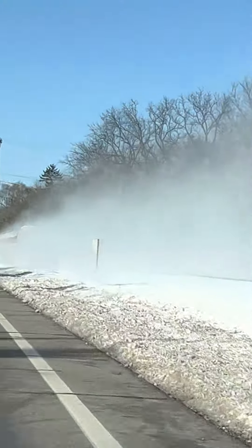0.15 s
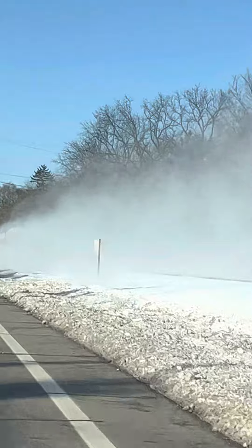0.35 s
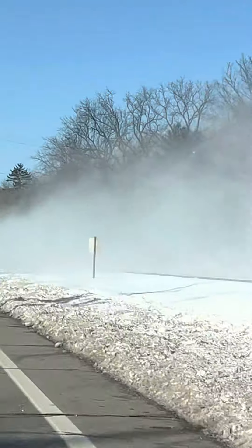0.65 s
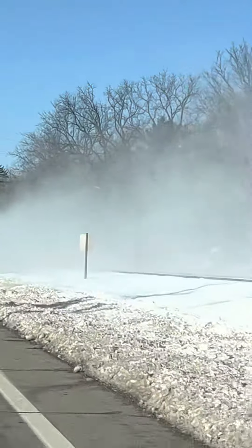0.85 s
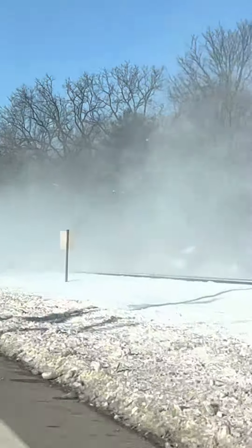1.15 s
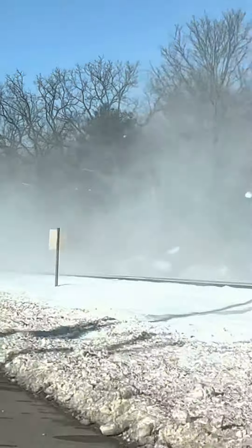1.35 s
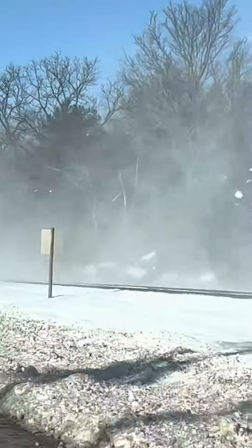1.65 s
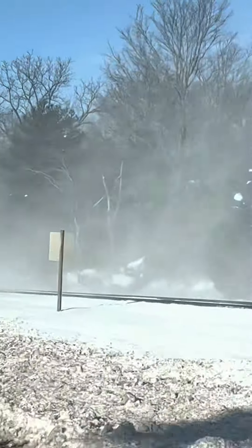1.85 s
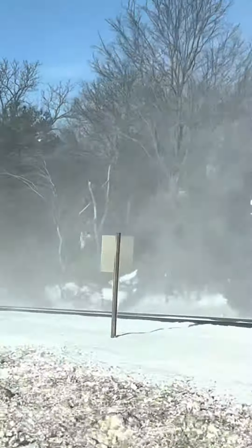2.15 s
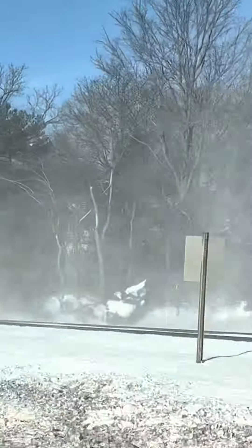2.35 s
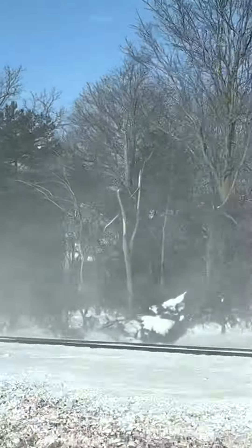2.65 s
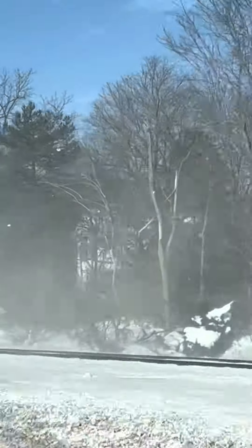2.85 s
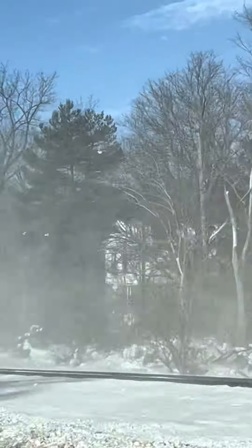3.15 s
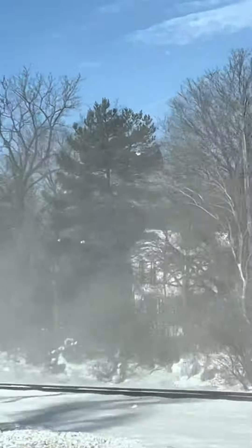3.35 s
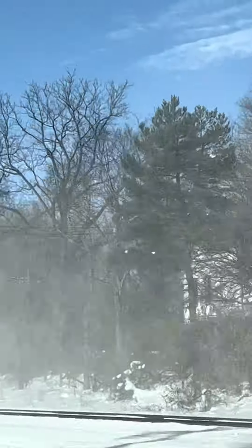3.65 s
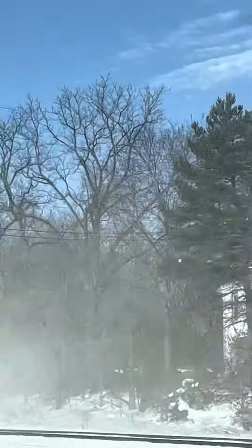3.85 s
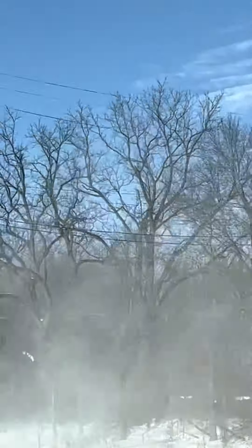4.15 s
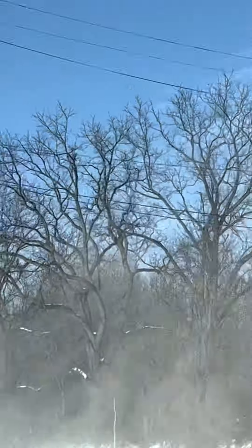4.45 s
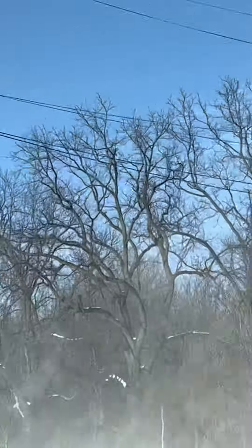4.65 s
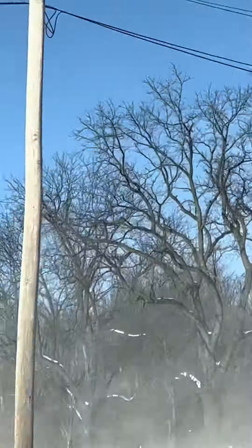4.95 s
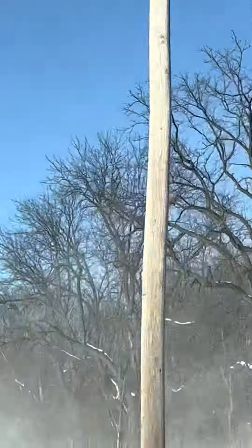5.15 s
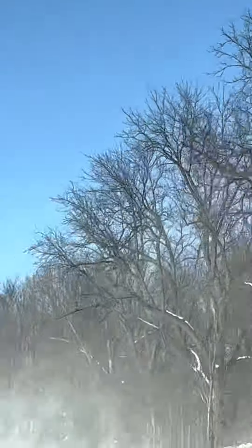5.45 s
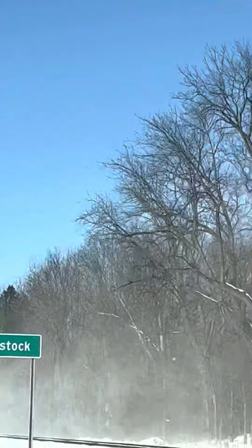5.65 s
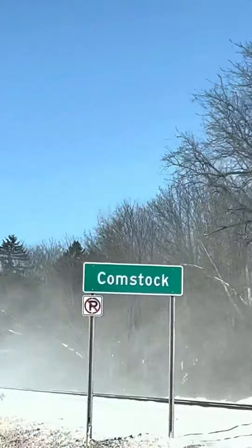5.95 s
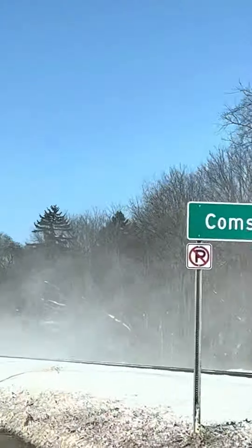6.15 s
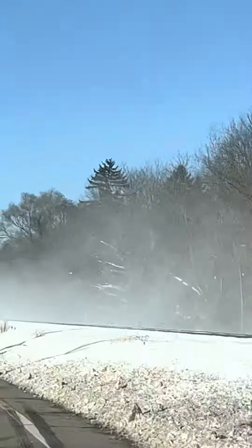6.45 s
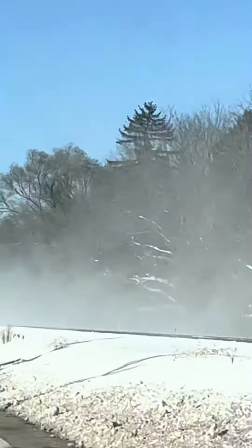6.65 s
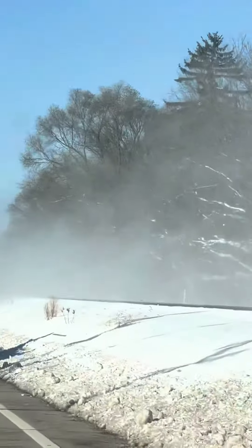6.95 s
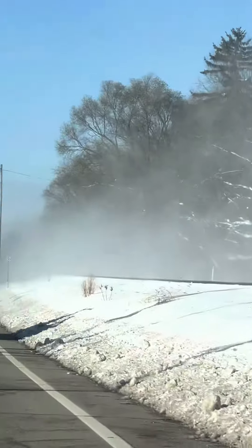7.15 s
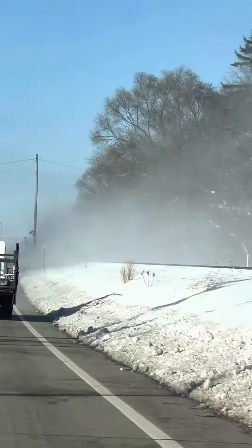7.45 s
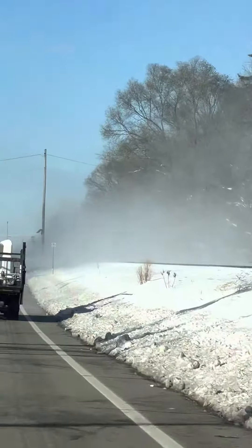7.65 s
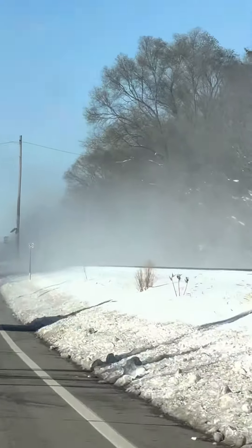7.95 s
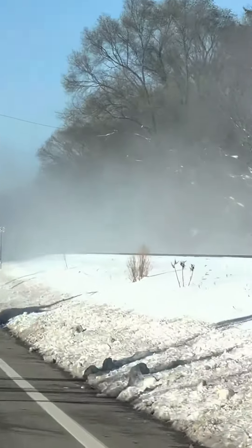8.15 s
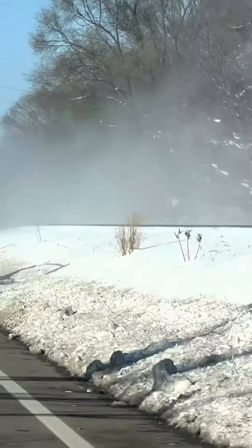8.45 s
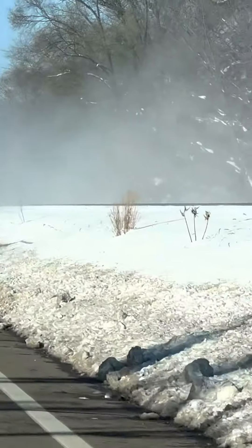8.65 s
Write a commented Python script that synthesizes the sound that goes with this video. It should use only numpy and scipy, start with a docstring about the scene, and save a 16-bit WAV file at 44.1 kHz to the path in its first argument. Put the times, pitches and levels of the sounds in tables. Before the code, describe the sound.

Low, uneven road rumble heard from a car seat, with bumps thumping the floor, slushy spray hissing louder, and faint grit ticks.

```python
"""The road shakes a car from below: its cabin booms, its panels rumble, and a dip and blows rock and thump the floor.
The tyres roar and drone, and their slushy spray hisses louder as the road gets wetter; lumps of slush rattle.
Wind rushes past the window, a breathy whistle fades as the drone fades, grit ticks and some plastic clicks once.
Most layers are noise shaped by resonances, with levels that follow the road, the water and the gusts;
the thumps are short sines, and the click is a set of ringing modes."""
import sys
import numpy as np
from scipy import signal
from scipy.fft import rfft, irfft
from scipy.io import wavfile
from scipy.ndimage import uniform_filter1d

SR = 44100
rng = np.random.default_rng(int(sys.argv[2]) if len(sys.argv) > 2 else 0)


def generate_wav(sig):
    """Save sig (samples, or channels by samples) to the path in sys.argv[1] as 16-bit PCM at SR."""
    pcm = np.round(np.clip(np.atleast_2d(sig).T, -1, 1) * 32767).astype(np.int16)
    wavfile.write(sys.argv[1], SR, pcm)


N = 388080   # samples: 8.8 s
TIME = np.arange(N) / SR   # seconds
BINS = np.maximum(np.arange(N // 2 + 1) * SR / N, 1)   # Hz of each frequency bin, at least 1


def from_db(db):
    """Turn decibels into gain."""
    return 10 ** (np.asarray(db) / 20)


def rms_one(x):
    """Scale to an rms (average strength) of one."""
    return x / np.sqrt(np.mean(x ** 2) + 1e-20)


def in_time(rows):
    """Draw each column of a (seconds, ..) table as a curve over time."""
    s, *columns = np.transpose(rows)
    return [np.interp(TIME, s, column) for column in columns]


def in_frequency(rows):
    """Draw each column of a (Hz, ..) table as a curve over frequency, on a log scale."""
    hz, *columns = np.transpose(rows)
    return [np.interp(np.log(BINS), np.log(hz), column) for column in columns]


def colour(points):
    """Gain per bin of a (Hz, dB) spectrum."""
    return from_db(in_frequency(points)[0])


def resonances(modes):
    """Gain per bin of separately driven resonances, whose powers add."""
    power = 0
    for hz, width_hz, db in modes:
        detuning = (BINS ** 2 - hz ** 2) / (BINS * width_hz)
        power = power + from_db(db) ** 2 / (1 + detuning ** 2)
    return np.sqrt(power)


def shaped(drive, gain):
    """Filter a drive by a gain per bin, then scale it to an rms of one."""
    return rms_one(irfft(rfft(drive) * gain, N))


def white():
    """Two unrelated noises: the direct sound and its diffuse part."""
    return rng.standard_normal((2, N))


def drift(rate_hz):
    """Slow random motion with a spread of one."""
    return shaped(rng.standard_normal(N), 1 / (1 + (BINS / rate_hz) ** 2))


def flicker(rate_hz, span_s=0.16):
    """Quick random motion with no slow swell and no extreme peaks."""
    chance = drift(rate_hz)
    slow_swell = uniform_filter1d(chance, max(int(span_s * SR), 2))
    return 2 * np.tanh(rms_one(chance - slow_swell) / 2)


def evened(x, span_s):
    """Hold a noise at a constant strength over the given span."""
    power = uniform_filter1d(x ** 2, max(int(span_s * SR), 2), axis=-1)
    return x / np.sqrt(power + 1e-6)


def wavering(x, share, rate_hz):
    """Let every resonance in a sound wander in pitch by stretching time a little."""
    place = np.cumsum(1 + share * drift(rate_hz)) % N
    return np.array([np.interp(place, np.arange(N), part) for part in x])


def held(end_s, fade_s, first_db, later_db):
    """A level in dB that holds, then glides to another."""
    return np.interp(TIME, [end_s, end_s + fade_s], [first_db, later_db])


def swell(crest_s, length_s, time=TIME):
    """A smooth rise to one and fall again; the length is taken at half height."""
    return np.exp2(-np.minimum((2 * (time - crest_s) / length_s) ** 2, 60))


def swells(rows):
    """Sum of swells from rows of (crest s, length s, height)."""
    coarse = TIME[::32]   # drawn on every 32nd sample to save work
    total = sum(height * swell(s, length, coarse) for s, length, height in rows)
    return np.interp(TIME, coarse, total)


def loudness_swells(rows):
    """Sum of swells whose heights are given in dB, as a gain."""
    return swells([(s, length, from_db(db)) for s, length, db in rows])


def bursts(rows):
    """Short dying scratches of contact noise from rows of (start s, dB, t60 s)."""
    envelope = np.zeros(N)
    age = TIME[:SR // 10]
    for s, db, t60 in rows:
        start = round(s * SR)
        envelope[start:start + len(age)] += from_db(db - 60 * age / t60)
    return envelope * white()


def ring(drive, hz, t60):
    """A resonator: a unit click sets a sine of height one ringing, dying by 60 dB in t60 seconds."""
    r, w = from_db(-60 / (t60 * SR)), 2 * np.pi * hz / SR
    return signal.lfilter([0, np.sin(w)], [1, -2 * r * np.cos(w), r * r], drive + 1e-18)


# Narrow resonances of the body panels and wheel arches.
# Each row: pitch in Hz, width in Hz, strength in dB (doubled when the resonances are squared).
BODY_MODES = [(204.5, 10, -1.5), (262, 22, -7.5), (603, 37, -1.5), (675, 68, -5.5), (1059, 18, -0.5),
              (1614, 52, -0.5), (1997, 70, -2), (2237, 130, 0.5), (2428, 86, 7), (2670, 46, -6.5),
              (3330, 14, 0), (3490, 39, 0.5), (4340, 300, 0.5), (6670, 430, -0.5), (7500, 110, -6.5),
              (10100, 120, 1.5)]


def through_body(drive, spectrum):
    """Sound from outside takes on a colour and the resonances of the body; rms one."""
    return shaped(drive, colour(spectrum) * (1 + resonances(BODY_MODES) ** 2))


# How strongly the car booms and rumbles.
# Each row: time in seconds, cabin boom in dB, panel rumble in dB, both before surges and trims.
ROAD_SHAKE = [(0, -27.5, -25), (.33, -24, -28.5), (.85, -28, -27), (1.25, -27, -33), (2.6, -24, -30),
              (3.2, -25, -27), (5.0, -22.5, -27.5), (6.9, -22, -26), (7.5, -20.5, -24), (8.8, -19.5, -25)]
# Surges and lulls of boom and rumble: bumps under the wheels, and air modes beating.
# Each row: crest in seconds, length in seconds, rise of the boom in dB, rise of the rumble in dB.
SURGES = [(0.058, 0.036, 6.5, 1.5), (0.137, 0.045, -10.5, 1.5), (0.194, 0.11, 3, 4.5),
          (0.312, 0.068, -8.5, -4.5), (.426, 0.12, 1, 0.5), (0.566, 0.052, 6.5, 2), (.675, 0.057, 10.5, -1),
          (.96, 0.04, 0, -2), (1.116, .098, 9, -1.5), (1.357, 0.077, -7, 2.5), (1.508, 0.062, 5, 0.5),
          (1.815, .08, 2, 1.5), (1.916, 0.12, -3.5, 1.5), (2.087, .06, 9, 0), (2.195, 0.049, 3.5, 5),
          (2.342, 0.095, -5, 4), (2.485, 0.18, 2, 3), (2.76, 0.089, 0, -0.5), (3.159, .07, 7.5, -2.5),
          (3.363, 0.048, 9.5, -0.5), (3.447, 0.037, 4.5, -1), (3.795, 0.11, -3, 0.5), (3.895, 0.028, 7, -1),
          (4.059, 0.079, -5, -4), (4.158, .05, 1.5, -5), (4.29, 0.044, 6, -5), (4.365, 0.04, 7, 0),
          (4.537, 0.14, -7, 1), (4.742, .05, 3, 0), (4.972, 0.07, 3, 0), (5.09, .1, -5.5, -1.5),
          (5.25, 0.076, 4.5, 1.5), (5.423, 0.1, 6.5, 2), (5.574, 0.068, -8.5, 1), (5.648, 0.018, 2, 3.5),
          (5.94, 0.063, 9, 0.5), (6.04, 0.053, -0.5, 4), (6.18, 0.088, 1.5, 3.5), (6.278, .09, -5.5, -2.5),
          (6.476, 0.12, 6, 3), (6.561, 0.031, 5, .5), (6.675, 0.056, 6, 2.5), (6.84, 0.11, -4.5, -2),
          (6.928, 0.057, 4, 1), (7.08, .064, 6.5, -4.5), (7.25, 0.038, 5, 5), (7.382, 0.045, 4.5, -0.5),
          (7.637, 0.031, 2, 1.5), (7.77, 0.33, -1, 0.5), (7.97, 0.16, 1, 1), (8.17, .055, 7, 0.5),
          (8.277, .1, -6.5, 1), (8.49, 0.065, -8.5, 4), (8.56, 0.082, 4.5, 1), (8.79, 0.14, 5.5, 3.5)]


def road_levels(uneven_db=2.04):
    """Levels of boom and rumble, and the jolts: rumble surges plus quick unevenness, all in dB."""
    boom_db, rumble_db = in_time(ROAD_SHAKE)
    boom_surge_db = swells([(s, length, boom) for s, length, boom, rumble in SURGES])
    rumble_surge_db = swells([(s, length, rumble) for s, length, boom, rumble in SURGES])
    jolt_db = rumble_surge_db + uneven_db * flicker(rate_hz=17)
    return boom_db + boom_surge_db, rumble_db + jolt_db, jolt_db


# Air modes of the cabin, the deepest first.
# Each row: pitch in Hz, width in Hz, strength in dB within its group (the deepest is scaled by itself).
CABIN_AIR_MODES = [(56.2, 6.8, 2.5), (67.7, 5.3, 6.5), (81, 24, -12), (96.3, 14, -6)]
WAVY_FROM_S = 4.1   # longer waves in the road begin to favour the deepest air mode


def cabin_boom(level_db, trim_db=1.83, top_hz=125, early_deep_db=-5.5, late_deep_db=0.0):
    """The road drives the lowest air modes, which beat together; the deepest grows on the wavy stretch."""
    dull = 1 / np.sqrt(1 + (BINS / top_hz) ** 8)   # little boom above top_hz
    deepest, *others = CABIN_AIR_MODES
    deep_gain = from_db(held(WAVY_FROM_S, .3, early_deep_db, late_deep_db))
    deep = deep_gain * shaped(white(), resonances([deepest]) * dull)
    upper = shaped(white(), resonances(others) * dull)
    return from_db(level_db + trim_db) * evened(deep + upper, span_s=0.1)


# Colour of the panel rumble. Each row: frequency in Hz, relative level in dB.
PANEL_COLOUR = [(20, -13.5), (60, -7), (100, -1.5), (132, 1), (160, -3.5), (190, -5.5), (222, -10),
                (260, -7), (330, -9.5), (400, -13), (500, -23.5), (800, -93)]


def panel_rumble(level_db, trim_db=0.35):
    """Floor and door panels pass on the texture of the road."""
    return from_db(level_db + trim_db) * evened(through_body(white(), PANEL_COLOUR), span_s=0.14)


SWAY_DB = -32   # steady shudder
DIP_S, DIP_LENGTH_S, DIP_DB = 5.38, 0.18, -20.5   # one long dip rocks the body; time is at the bottom


def body_sway(sway_hz=47, width_hz=20):
    """The body shudders on its springs, deeper than the boom of the cabin."""
    level = from_db(SWAY_DB) + from_db(DIP_DB) * swell(DIP_S, DIP_LENGTH_S)
    shudder = shaped(white(), resonances([(sway_hz, width_hz, 0)]) ** 2)
    return level * evened(shudder, span_s=0.28)


# Seams and potholes thump the floor.
# Each row: hardest moment in seconds, length in seconds, pitch in Hz, height in dB before the trim.
FLOOR_THUMPS = [(0.115, .09, 101, -16), (.192, 0.078, 168, -18), (1.622, 0.022, 115, -18),
                (2.04, 0.037, 110, -18), (2.275, 0.052, 100, -25), (3.224, 0.082, 102, -19),
                (3.458, 0.033, 104, -18.5), (3.73, 0.14, 103, -26.5), (4.382, 0.053, 119, -20),
                (5.373, 0.14, 122, -22.5), (5.823, 0.12, 125, -19), (5.852, 0.11, 94, -13),
                (6.644, 0.043, 134, -14), (7.053, 0.062, 92, -14.5), (7.214, 0.046, 117, -17.5),
                (7.895, 0.029, 116, -12), (8.324, 0.079, 102, -15)]


def thumps(trim_db=-1.0):
    """Each blow from the road makes the floor flex: a swelling sine with a random starting phase."""
    flex = np.zeros(N)
    for s, length, hz, db in FLOOR_THUMPS:
        wave = np.sin(2 * np.pi * (hz * TIME + rng.random()))
        flex += from_db(db + trim_db) * swell(s, length) * wave
    return np.array([flex, np.zeros(N)])   # no diffuse part


# Water on the road. Each row: time in seconds, wetness in dB about the usual level.
ROAD_WETNESS = [(0.0, -3.5), (1.1, -3.5), (1.24, -4.5), (2.1, -4), (2.52, 2), (2.65, -4), (3.17, -2.5),
                (3.35, 0.5), (4.32, 0.5), (4.52, 2.5), (5.29, 5), (5.42, -1.5), (5.63, 3.5), (6.7, 4.5),
                (7.03, 7.5), (7.77, 4.5), (8.35, 6), (8.8, 4)]
# Puddles and drier spots.
# Each row: middle in seconds, length in seconds, rise of the roar in dB, rise of the spray in dB
# (both rises are then scaled by how closely the layer follows the wetness).
PUDDLE_RISES = [(0.17, 0.13, 4, 3.5), (.3, 0.085, -1.5, -5), (.578, 0.034, 3, 0.5), (0.886, 0.037, 3, 1),
                (1.108, .06, 1, 0.5), (1.592, .1, 0, -5), (1.7, .085, 3, 3), (1.926, 0.17, 0, -2),
                (2.148, .12, 5.5, 4), (2.795, 0.17, 4, 3), (3.268, 0.11, 1.5, 1.5), (3.763, 0.11, 3, 2.5),
                (3.987, 0.035, 3, 3.5), (4.2, 0.32, 0, 0), (4.477, 0.093, 3, 3.5), (4.587, 0.088, 1.5, 2),
                (4.846, .17, -1.5, -1.5), (5.173, 0.036, -0.5, 1), (5.5, 0.071, 3, 0), (5.74, .07, 0, 1.5),
                (5.878, 0.064, 2, 1.5), (6.001, 0.11, 4, 3), (6.167, 0.032, 2, 0), (6.53, 0.075, 2.5, 2.5),
                (6.686, 0.025, 3, -4.5), (7.612, 0.035, 1, .5), (7.757, 0.17, -2, -2.5),
                (7.935, 0.29, 1.5, 2), (8.424, 0.072, 0.5, 0), (8.645, 0.11, -2.5, -5)]
ROAR_DB, ROAR_FOLLOWS = -37, 1.154   # before trim, at the usual wetness; dB per dB of wetness
SPRAY_DB, SPRAY_FOLLOWS = -65, 1.28   # the same for the spray


def wet_road_levels():
    """Levels in dB of the tyre roar and of the thrown water, which both rise with the wetness."""
    wet_db, = in_time(ROAD_WETNESS)
    roar_rise_db = wet_db + swells([(s, length, roar) for s, length, roar, hiss in PUDDLE_RISES])
    spray_rise_db = wet_db + swells([(s, length, hiss) for s, length, roar, hiss in PUDDLE_RISES])
    return ROAR_DB + ROAR_FOLLOWS * roar_rise_db, SPRAY_DB + SPRAY_FOLLOWS * spray_rise_db


# Colour of the tyre roar. Each row: frequency in Hz, relative level in dB.
ROAR_COLOUR = [(250, -5), (400, 0), (500, 0), (560, -1), (640, -3.5), (700, 0), (860, -7), (1050, -10),
               (1200, -11), (1400, -16), (2200, -43), (4000, -72.5)]


def tread_roar(level_db, patches, trim_db=-0.32, patchy_db=1.05, wander=0.00898):
    """Tread blocks slap the asphalt, louder on each rough patch; the resonances wander a little."""
    roar = wavering(through_body(white(), ROAR_COLOUR), wander, rate_hz=3.05)
    return from_db(level_db + trim_db + patchy_db * patches) * roar


# The drone is strong until the coarse asphalt ends, then fades; levels are before the jolts.
COARSE_END_S, COARSE_FADE_S, COARSE_DRONE_DB, SMOOTH_DRONE_DB = 0.93, 0.57, -29.5, -52.5


def tyre_drone(jolt_db, coarse_hz=164, width_hz=70, cavity_hz=222, cavity_width_hz=55, cavity_db=-41):
    """Coarse asphalt makes the tyres drone; the ring of air inside them hums on every surface."""
    level_db = held(COARSE_END_S, COARSE_FADE_S, COARSE_DRONE_DB, SMOOTH_DRONE_DB) + jolt_db
    # squaring a resonance makes it narrower and steeper
    drone = evened(shaped(white(), resonances([(coarse_hz, width_hz, 0)]) ** 2), span_s=0.15)
    cavity = shaped(white(), resonances([(cavity_hz, cavity_width_hz, 0)]) ** 2)
    return from_db(level_db) * drone + from_db(cavity_db) * cavity


# Colour of the spray. Each row: frequency in Hz, relative level in dB.
SPRAY_COLOUR = [(900, -4.5), (1400, -1), (1580, 9.5), (1900, 13.5), (2170, 11.5), (2330, -7.5), (2700, 6.5),
                (3800, -0.5), (4700, -1.5), (5100, -11.5), (6000, -2), (6800, -1), (8050, 1), (9000, -11.5),
                (10300, -14), (11100, -37), (13000, -62)]


def spray(level_db, patches, trim_db=12, patchy_db=1.45, drops_per_s=6000, size_db=5.5, mist_db=4.0):
    """Mist and countless droplets of uneven size strike the wheel arches."""
    sizes = from_db(size_db * np.minimum(rng.exponential(1, N), 4))   # capped, so no giant drops
    landings = rng.random(N) < drops_per_s / SR
    drops = rms_one(landings * sizes * white())
    water = through_body(drops + from_db(mist_db) * white(), SPRAY_COLOUR)
    return from_db(level_db + trim_db + patchy_db * patches) * water


# Big lumps of slush slap the wheel arch.
# Each row: start in seconds, level in dB before the arch, time to fall by 60 dB in seconds.
BIG_SPLASHES = [(4.44, -43, 0.084), (5.586, -48, .1), (5.681, -40, 0.084), (5.811, -43, .08),
                (6.838, -42, 0.091), (7.594, -40.5, 0.091), (7.903, -43.5, 0.11), (8.428, -37, .1)]
# Each row: pitch in Hz, width in Hz, strength in dB, before the resonances are squared.
ARCH_MODES = [(1562, 110, 2), (1800, 130, 0), (2080, 140, 0.5), (2224, 110, 2.5)]


def spatter(level_db, trim_db=6.5, lumps_per_s=120, size_db=1.0, lump_t60=0.04):
    """Small lumps of slush at random, and a few big ones, rattle the wheel arch."""
    landings = rng.random(N) < lumps_per_s / SR
    lumps = landings * from_db(size_db * np.minimum(rng.exponential(1, N), 2))
    fade = from_db(-60 / (lump_t60 * SR))   # per sample
    envelope = signal.lfilter([1], [1, -fade], lumps + 1e-18)
    small = from_db(level_db + trim_db) * rms_one(envelope * white())
    arch = rms_one(resonances(ARCH_MODES) ** 2)
    return irfft(rfft(small + bursts(BIG_SPLASHES)) * arch, N)


# A tyre runs through strips of slush.
# Each row: deepest moment in seconds, length in seconds, level in dB before the patches.
SLUSH_STRIPS = [(3.153, 0.033, -46.5), (3.266, .07, -46.5), (3.68, 0.13, -55.5), (3.844, .14, -44.5),
                (4.57, 0.5, -50), (5.188, 0.11, -48)]
# Each row: pitch in Hz, width in Hz, relative strength in dB, before the resonances are squared.
SLUSH_MODES = [(1700, 440, 4), (2130, 240, -2.5), (4330, 330, -11.5)]


def slush(patches, patchy_db=0.5):
    """Heavier water swishes in the wheel arch, lower than the fine spray."""
    swish = shaped(white(), resonances(SLUSH_MODES) ** 2)
    return loudness_swells(SLUSH_STRIPS) * from_db(patchy_db * patches) * swish


# Fine mist blows against the glass.
# Each row: thickest moment in seconds, length in seconds, level in dB before the patches.
MIST_GUSTS = [(3.36, .06, -57), (3.518, 0.17, -61), (3.75, 0.17, -57.5), (3.95, 0.16, -61),
              (6.35, 0.31, -63), (8.3, 0.4, -65)]
# Each row: pitch in Hz, width in Hz, relative strength in dB, before the resonances are squared.
MIST_MODES = [(4330, 600, 3), (7500, 4600, 1.5)]


def mist(patches, patchy_db=3.0, top_hz=9300):
    """The finest droplets hiss on the glass in uneven gusts."""
    gain = resonances(MIST_MODES) ** 2 / np.sqrt(1 + (BINS / top_hz) ** 32)   # steep end at top_hz
    return loudness_swells(MIST_GUSTS) * from_db(patchy_db * patches) * shaped(white(), gain)


# A breathy whistle fades away as the drone of the tyres fades; levels are before flutter.
WHISTLE_END_S, WHISTLE_FADE_S, EARLY_WHISTLE_DB, LATE_WHISTLE_DB = 0.98, 0.11, -52, -70


def breathy_whistle(whistle_hz=1400, width_hz=130):
    """Noise through one narrow resonance gives a breathy tone, nearly gone after its fade."""
    level_db = held(WHISTLE_END_S, WHISTLE_FADE_S, EARLY_WHISTLE_DB, LATE_WHISTLE_DB)
    return from_db(level_db) * shaped(white(), resonances([(whistle_hz, width_hz, 0)]) ** 2)


# Air past the window. Each row: time in seconds, level of the rush in dB before flutter.
WIND_RUSH = [(0, -45), (.32, -47), (.65, -45), (1.1, -44.5), (1.22, -47), (1.6, -50), (1.72, -48),
             (1.95, -47.5), (2.5, -46.5), (3.8, -50), (7, -52.5), (8.8, -47)]
# Colour of the rush. Each row: frequency in Hz, relative level in dB.
RUSH_COLOUR = [(300, 3), (520, 9), (635, -2.5), (720, 10), (950, -5.5), (1150, -10), (1350, 0), (1650, 2),
               (2200, -5), (2400, -4), (2800, -5), (3300, -12), (4200, -21), (6000, -23), (9000, -20.5),
               (10500, -28.5), (12000, -69)]
# The window seal hisses through two resonances.
# Each row: pitch in Hz, width in Hz, relative strength in dB, before the resonances are squared.
SEAL_MODES = [(5000, 510, -1), (5570, 650, 1)]
# Gusts press on the window seal.
# Each row: peak in seconds, length in seconds, rise of the hiss in dB.
SEAL_GUSTS = [(.85, 1.4, 8.5), (7.8, 3.2, 10.5)]
SEAL_DB = -75   # hiss without a gust, before flutter


def wind():
    """Turbulent air rushes at the window, with a thin hiss from its seal."""
    rush_db, = in_time(WIND_RUSH)
    hiss_db = SEAL_DB + swells(SEAL_GUSTS)
    rush = from_db(rush_db) * shaped(white(), colour(RUSH_COLOUR))
    hiss = from_db(hiss_db) * shaped(white(), resonances(SEAL_MODES) ** 2)
    return rush + hiss


# The sharpest gusts make the seal sing thinly.
# Each row: peak in seconds, length in seconds, level in dB before flutter.
SEAL_WHISTLES = [(.79, .15, -68), (1.07, .11, -68), (1.31, 0.11, -67)]


def seal_whistle(whistle_hz=5050, width_hz=260, flutter_db=2.0):
    """Air squeezes through the window seal in fluttering puffs."""
    flutter = from_db(flutter_db * drift(rate_hz=30))
    thin_noise = shaped(white(), resonances([(whistle_hz, width_hz, 0)]) ** 2)
    return loudness_swells(SEAL_WHISTLES) * flutter * thin_noise


# Grit thrown against the body.
# Each row: start in seconds, level in dB before colour and trim, time to fall by 60 dB in seconds.
GRIT_TICKS = [(.443, -52, 0.025), (.691, -57, .025), (.749, -57, .025), (1.299, -56, 0.087),
              (1.668, -58, .03), (1.96, -60, .025), (2.059, -60, .025), (2.144, -55, 0.095),
              (2.524, -51, .03), (4.684, -49.5, 0.016), (5.611, -51, 0.033), (6.84, -51, .03)]
# Colour of the ticks, and of the tail of the click. Each row: frequency in Hz, gain in dB.
TICK_COLOUR = [(300, -20), (1000, -6), (2200, 12), (4000, 7.5), (8000, 7), (10500, 1), (13000, -38)]


def grit(trim_db=1.0):
    """Grains of ice and salt tick on the body."""
    return from_db(trim_db) * irfft(rfft(bursts(GRIT_TICKS)) * colour(TICK_COLOUR), N)


# The plastic scratches as it settles after its snap.
# Each row: start in seconds, level in dB relative to the snap, time to fall by 60 dB in seconds.
SETTLING_SCRATCHES = [(3.4078, -18.5, 0.006), (3.4112, -29.5, 0.0052), (3.4165, -34, .014)]
# Ringing modes of the plastic.
# Each row: pitch in Hz, level in dB before trim and filter, time to fall by 60 dB in seconds.
PLASTIC_MODES = [(3050, -34, .026), (3460, -33, .018), (3620, -31, .017), (3840, -28.5, 0.019),
                 (4660, -36, .014), (4960, -23, 0.012), (6440, -24, 0.012), (7010, -38, .018),
                 (7880, -30, 0.026), (9500, -40, .018), (10140, -36, .021), (13700, -45, .014),
                 (15400, -42, .016)]
# The larger panel behind it answers with a hollow knock.
# Each row: pitch in Hz, level in dB, time to fall by 60 dB in seconds.
KNOCK_MODES = [(1296, -28.5, .06), (1510, -28, .04)]


def plastic_click(snap_s=3.4068, trim_db=-1.0, tail_db=-44, tail_t60=0.087, knock_s=3.411, thin_hz=2700):
    """One sharp snap and a few scratches ring the plastic; the padded cabin returns a very short tail."""
    contact, push = bursts(SETTLING_SCRATCHES), np.zeros((2, N))
    contact[0, round(snap_s * SR)] += 1
    push[0, round(knock_s * SR)] = 1
    snap = sum(from_db(db + trim_db) * ring(contact, hz, t60) for hz, db, t60 in PLASTIC_MODES)
    # the snap is thin: little of it lies below thin_hz
    snap = signal.sosfilt(signal.butter(2, thin_hz, "high", fs=SR, output="sos"), snap)
    knock = np.zeros((2, N))
    for k, (hz, db, t60) in enumerate(KNOCK_MODES):
        knock += (-1) ** k * from_db(db) * ring(push, hz, t60)   # the modes start in opposite directions
    tail_noise = bursts([(snap_s, tail_db, tail_t60)])
    tail = irfft(rfft(tail_noise) * colour(TICK_COLOUR), N)
    return snap + knock + tail


# The two microphone ports, left and right.
# Each row: frequency in Hz, likeness of the two from 0 to 1, radians by which the right leads,
# left minus right in dB.
PORTS = [(65, .9999, 0, .1), (170, .997, .02, .4), (300, .98, .12, .7), (460, .8, .55, 1.5),
         (580, .9, .65, 3), (700, .92, .45, -1.2), (950, .8, .65, -.6), (1180, .83, 1.1, -.7),
         (1400, .3, 1.8, -3.7), (1560, .8, -.3, -3), (1850, .997, 0, 0), (2150, .99995, 0, 0),
         (4800, .99995, 0, 0), (5250, .85, 1.05, 0), (7500, .94, 1.3, 0), (11000, .8, 1.3, 0)]


def at_ports(sound):
    """The direct part reaches both ports with a phase step; the diffuse part differs between them."""
    likeness, lead, balance_db = in_frequency(PORTS)
    direct, diffuse = rfft(sound)
    side = np.array([[1], [-1]])   # left, right
    shared = np.sqrt((1 + likeness) / 2) * direct
    pair = shared + side * np.sqrt((1 - likeness) / 2) * diffuse
    balance = from_db(side * balance_db / 2)
    return irfft(pair * balance * np.exp(-.5j * side * lead), N)


def scene(flutter_db=1.9):
    """Road, tyres, water, wind and small ticks, heard from a seat by the window."""
    boom_db, rumble_db, jolt_db = road_levels()
    roar_db, water_db = wet_road_levels()
    patches = flicker(rate_hz=35)   # wet and rough patches pass under the tyres
    road = cabin_boom(boom_db) + panel_rumble(rumble_db) + body_sway() + thumps()
    tyres = tread_roar(roar_db, patches) + tyre_drone(jolt_db)
    water = spray(water_db, patches) + spatter(water_db) + slush(patches) + mist(patches)
    flutter = from_db(flutter_db * drift(rate_hz=21))   # the whistle and the wind flutter together
    air = flutter * (breathy_whistle() + wind()) + seal_whistle()
    ticks = grit() + plastic_click()
    return at_ports(road + tyres + water + air + ticks)


def record(dry, low_cut_hz=23, top_cut_hz=15800):
    """The microphone drops the deepest bass and the top is cut steeply."""
    thinned = signal.sosfilt(signal.butter(4, low_cut_hz, "high", fs=SR, output="sos"), dry)
    return signal.sosfilt(signal.ellip(10, .1, 80, top_cut_hz, fs=SR, output="sos"), thinned)


dry = scene()
out = record(dry)
generate_wav(out)
```